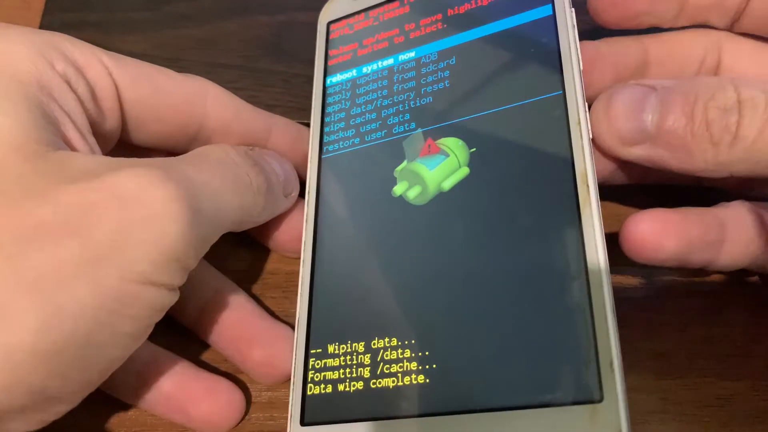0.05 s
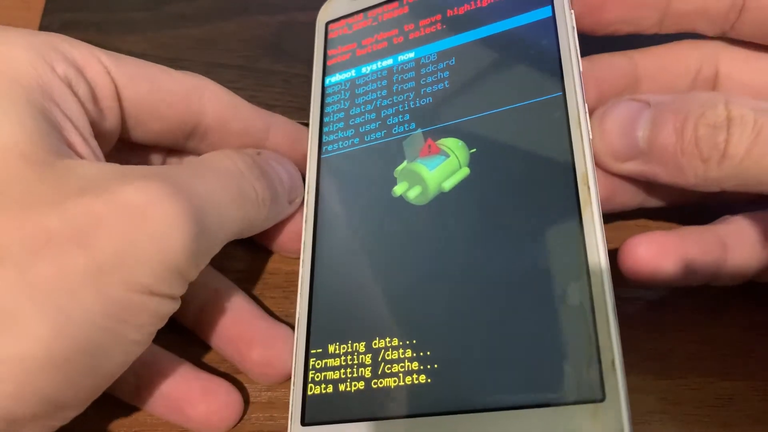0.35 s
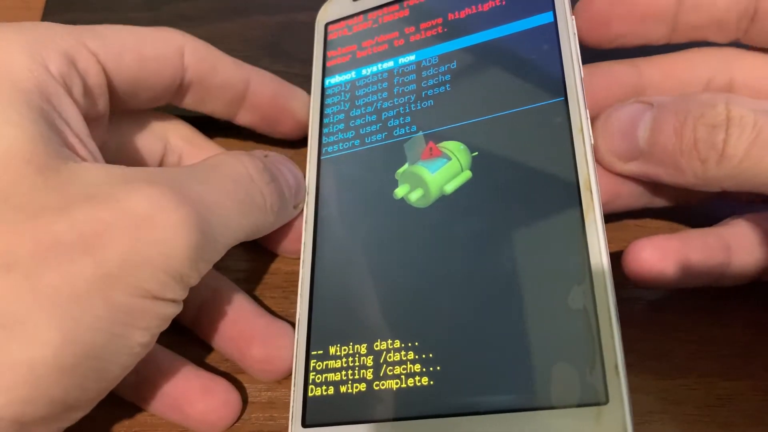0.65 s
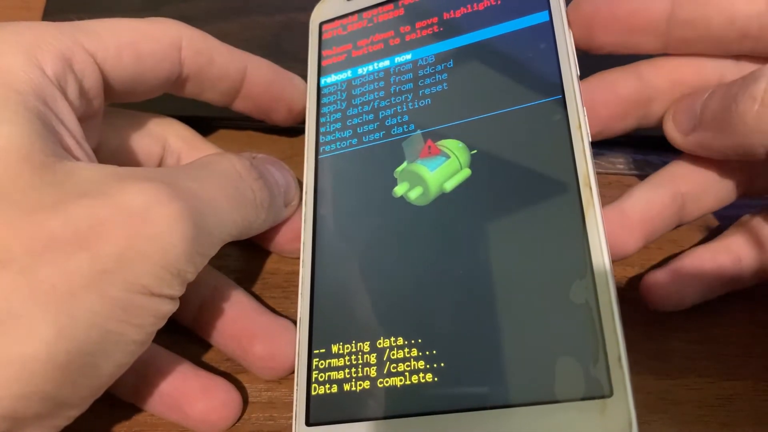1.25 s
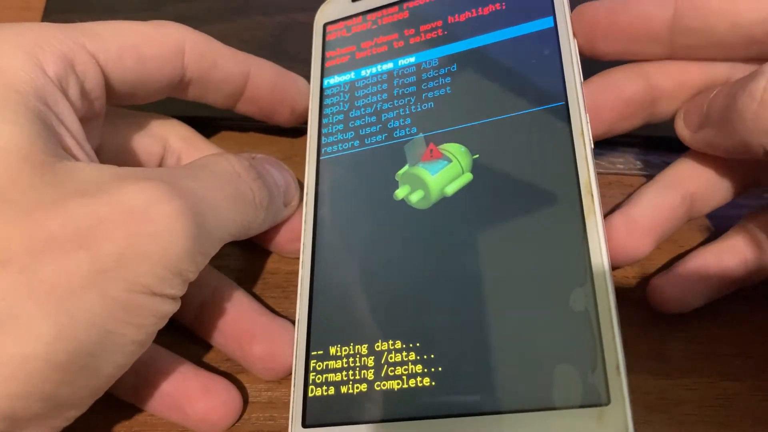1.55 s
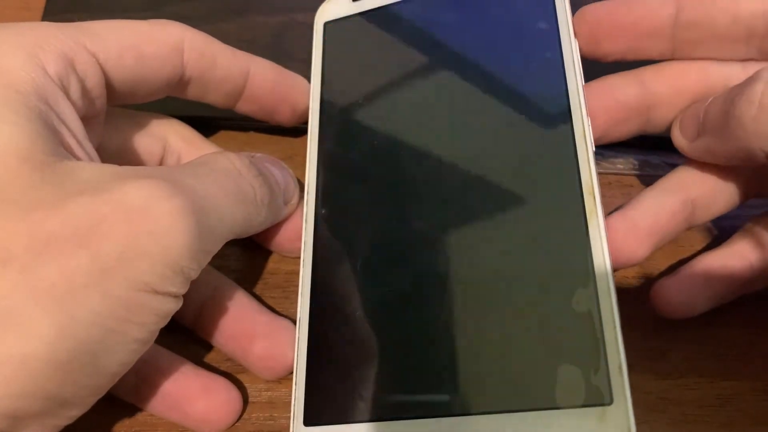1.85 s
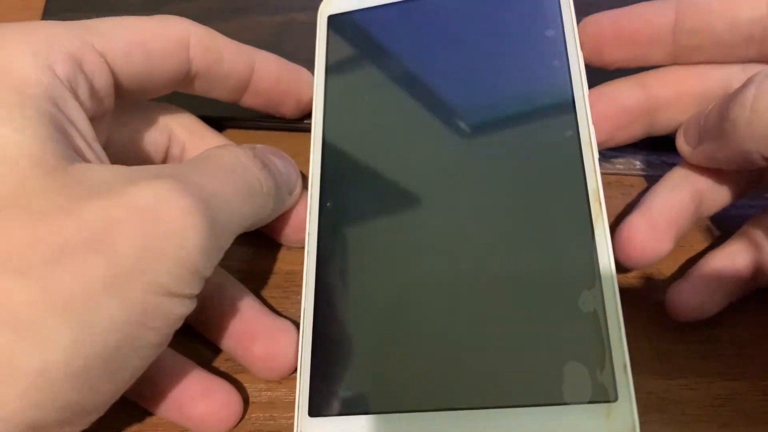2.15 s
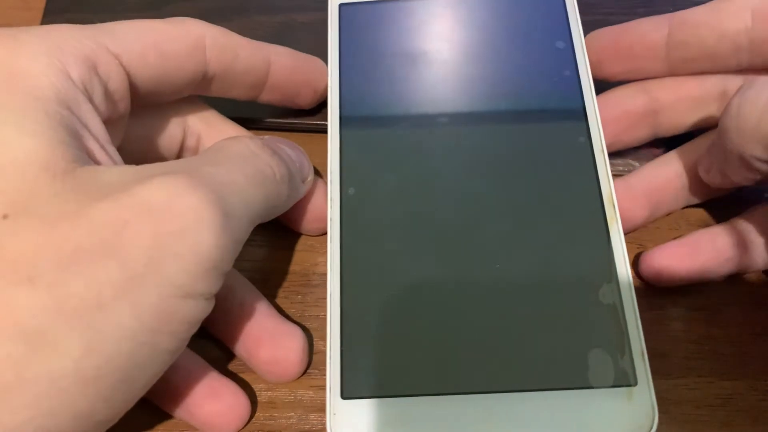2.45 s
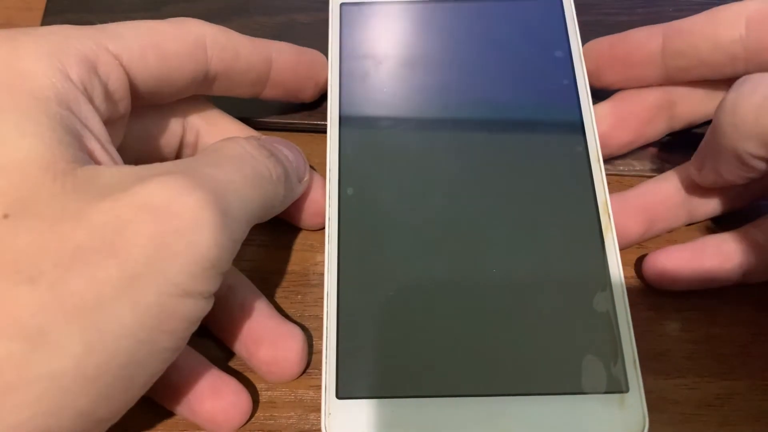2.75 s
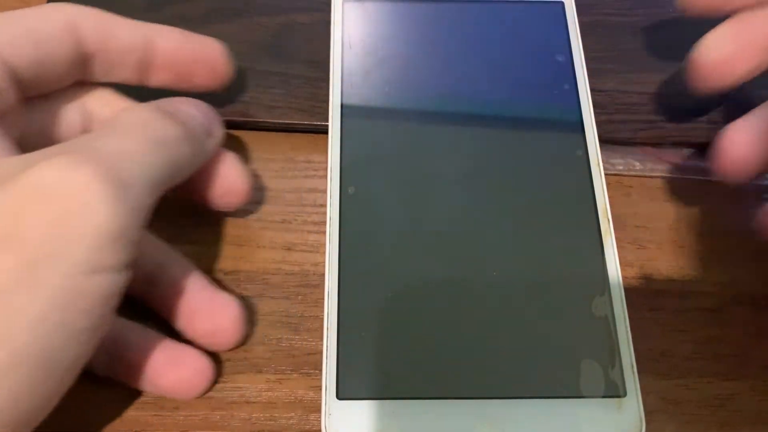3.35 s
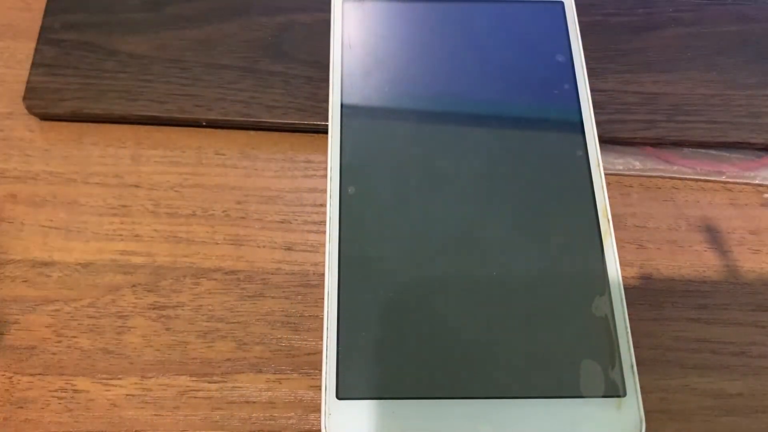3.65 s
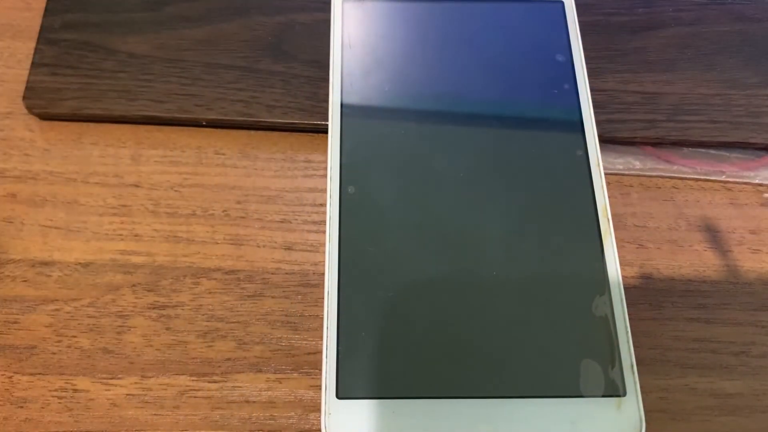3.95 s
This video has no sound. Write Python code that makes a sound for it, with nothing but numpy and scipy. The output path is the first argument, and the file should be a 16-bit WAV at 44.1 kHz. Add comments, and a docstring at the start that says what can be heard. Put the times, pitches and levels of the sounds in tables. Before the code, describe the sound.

A phone handled and set down on a wooden table, with light taps and sliding hands.

```python
"""Phone handled on a wooden table.

Two hands hold a phone in a quiet room, over mains hum and a low throbbing drone like a far engine.
Fingers rub, a side button clicks and the case ticks against the wood. The phone is let down with soft
thuds of the table and the hands slide away: skin hisses, and its ridges make a faint rising zip."""
import sys
import numpy as np
from scipy import signal
from scipy.fft import rfft, irfft
from scipy.io import wavfile
from scipy.ndimage import uniform_filter1d

SR = 44100
rng = np.random.default_rng(int(sys.argv[2]) if len(sys.argv) > 2 else 0)


def to_wav(sig):
    """Store sig (one row per channel, or 1-D mono) as 16-bit WAV at the path in sys.argv[1].

    Samples outside -1..1 are clipped; the rate is SR.
    """
    pcm = np.clip(np.atleast_2d(sig), -1, 1) * 32767
    pcm = np.round(pcm).astype(np.int16)
    wavfile.write(sys.argv[1], SR, pcm.T)  # frames by channels


N = 176400
T = np.arange(N) / SR
HZ = np.fft.rfftfreq(N, 1 / SR)

# Stereo image of friction noise: freq_hz, correlation
FRICTION_CORRELATION = [(200, 1), (700, 0.39), (1300, -0.64), (2000, -0.55), (3300, 0.59), (5000, -0.57)]


def amp(db):
    """Decibels to gain."""
    return 10 ** (np.asarray(db) / 20)


def unit(x):
    """Scale to rms 1."""
    return x / np.sqrt(np.mean(x ** 2) + 1e-20)


def at_hz(points, hz):
    """Interpolate a table over log frequency."""
    freq_hz, value = np.transpose(points)
    return np.interp(np.log(hz + 1), np.log(freq_hz + 1), value)


def add(mix, start_s, sound):
    """Mix a stereo sound in at start_s."""
    part = mix[:, round(start_s * SR):][:, :sound.shape[1]]
    part += sound[:, :part.shape[1]]


def drift(rate_hz):
    """Low-passed random wander, rms 1."""
    return unit(irfft(rfft(rng.standard_normal(N)) * np.exp(-(HZ / rate_hz) ** 2), N))


def noise(colour_db, correlation):
    """Coloured stereo noise, rms 1; left-right correlation clipped to +-1."""
    left, independent = rfft(rng.standard_normal((2, N)))
    same = np.clip(at_hz(correlation, HZ), -1, 1)
    right = same * left + np.sqrt(1 - same ** 2) * independent
    return unit(irfft(np.array([left, right]) * amp(colour_db), N))


def sides(pan_db):
    """Channel offsets in dB; positive pans left."""
    return np.array([[.5], [-.5]]) * pan_db


def swell(centre_s, half_width_s):
    """Gaussian envelope, 1/e at the half width."""
    return np.exp(-((T - centre_s) / half_width_s) ** 2)


def tone(hz, waver_db, waver_hz, slip_rad):
    """Sine on a pitch curve, unsteady in level and phase."""
    turns = np.cumsum(hz * np.ones(N)) / SR + rng.random()
    level = np.sqrt(2) * amp(waver_db * drift(waver_hz))
    return level * np.sin(2 * np.pi * turns + slip_rad * drift(waver_hz))


def ring(modes, rise_s):
    """Damped modes after one blow; softer blows rise more slowly."""
    t = T[:SR // 4]
    ringing = sum(amp(db - 60 * t / t60_s) * np.sin(2 * np.pi * hz * t) for hz, db, t60_s in modes)
    return (1 - np.exp(-t / rise_s)) * ringing


def case_tap(decay_s, bands_db, rise_s=0.00042, size=4096):
    """One contact and a few milliseconds of chatter ring the case."""
    # Tap spectrum bands: freq_hz
    bands_hz = [450, 850, 1700, 5000, 12000]
    # Resonances of the phone on wood: centre_hz, width_hz, lift_db
    resonances = [(544, 160, 10), (1150, 117, 9.5), (1510, 180, 5), (2100, 160, -3), (2630, 460, -0.5),
                  (3230, 310, -5.5), (3960, 351, -5.5), (4480, 690, 3), (5200, 150, -0.5), (6700, 390, 1.5),
                  (9200, 820, 9.5)]
    # Case radiation: freq_hz, pan_db
    radiation = [(450, 3), (1700, 1), (3000, 2), (5000, -5.5), (9000, -1.5)]
    hz, t = abs(np.fft.fftfreq(size, 1 / SR)), T[:size]
    colour_db = at_hz(list(zip(bands_hz, bands_db)), hz)
    colour_db += sum(db / (1 + (2 * (hz - centre) / width) ** 2) for centre, width, db in resonances)
    low_cut = (hz ** 2 + 100) / (hz ** 2 + 260 ** 2)
    gain = amp(colour_db - 1 + sides(at_hz(radiation, hz))) * low_cut
    body = np.exp(np.conj(signal.hilbert(np.log(gain))))  # minimum phase
    chatter = rng.choice([-1., 1.], (3, size)) * np.exp(-t / decay_s) * (1 - np.exp(-t / rise_s))
    chatter /= np.linalg.norm(chatter, axis=1, keepdims=True)
    correlation = 0.59
    rattle = 0.89 * np.fft.fft(np.sqrt(correlation) * chatter[2] + np.sqrt(1 - correlation) * chatter[:2])
    contact = 0.46 * np.fft.fft(np.arange(size) == round(rise_s * SR))
    lows = 1 / (1 + (hz / 3000) ** 2)  # contact carries the lows, chatter the highs
    force = rattle * np.sqrt(1 - .75 * lows) + contact * lows
    return np.fft.ifft(force * body).real


def case_ticks():
    """The case knocks on the wood, each knock with a short echo."""
    # Knocks: start_s, chatter_decay_s, then gain_db for each of case_tap's five bands
    knocks = [(0.4746, 0.0022, -6.5, -2, -9, -37.5, -41), (1.4106, .0014, -42, -26, -21.5, -33, -48),
              (2.3865, 0.0039, -12, -16, -11, -30, -29), (2.391, 0.0024, -13, -15, -15, -24.5, -34),
              (2.3937, .0012, -8, -9.5, -1.5, -19, -45), (2.5306, 0.0016, -46, -14.5, -9.5, -13, -17.5),
              (2.8843, 0.003, -10, -6, -25, -57, -51), (2.9075, 0.00068, -37, -44, -53, -49, -32),
              (3.129, 0.0029, -4.5, -15, -12, -32, -50), (3.1333, 0.0038, -1.5, -5.5, -8, -36, -47),
              (3.1622, 0.0048, -4, -3, -13.5, -19, -54), (3.181, 0.0048, -5, -16, -27, -26, -36),
              (3.212, 0.0032, -27, -15, -22, -40, -41), (3.2876, 0.00089, -8, -17, -18, -10, -20),
              (3.3158, .0014, -37, -8, -11, -7.5, -26), (3.802, 0.0049, -27, -30, -19, -21, -24),
              (3.816, .0053, -31, -51, -12, -17, -35), (3.825, 0.0045, -12, -29, -17, -17, -26.5)]
    out = np.zeros((2, N))
    for start_s, decay_s, *bands_db in knocks:
        knock = case_tap(decay_s, bands_db)
        add(out, start_s, knock)
        add(out, start_s, amp(-6) * room_echo(knock))
    return out


def table_bumps():
    """The table takes the weight of phone and hands in dull, damped thuds."""
    # Blows: start_s, gain_db
    blows = [(1.838, -31), (2.407, -36), (3.153, -26.5), (3.178, -31), (3.201, -25.5)]
    # Table modes: freq_hz, gain_db, t60_s
    modes = [(80, -5, 0.088), (117.6, 5.5, 0.054), (162.3, -4, 0.071), (296, -14.5, 0.075)]
    out = np.zeros((2, N))
    for start_s, gain_db in blows:
        add(out, start_s, amp(gain_db + sides(pan_db=-4)) * ring(modes, rise_s=0.0059))
    return out


def hand_slide():
    """Dry skin hisses over wood with uneven grip, brightest early in the stroke."""
    # Stroke: time_s, gain_db, tilt_db_per_octave
    stroke = [(3.11, -73, -6), (3.14, -54.5, -2), (3.194, -52, 0.5), (3.265, -59, -5.5), (3.3, -52, -3.5),
              (3.36, -46, 2), (3.46, -45, 1), (3.58, -43.5, 0.5), (3.72, -44, -0.1), (3.82, -48.5, -1),
              (3.85, -62.5, -2), (3.898, -66.5, -6), (4, -69, -2)]
    # Skin-on-wood spectrum: freq_hz, relative_db
    spectrum = [(150, -15), (500, -1), (850, -1.5), (1400, 2), (2200, -2.5), (3600, -0.5), (4700, -5.5),
                (6000, -3), (7500, -1.5), (8800, -1), (10700, -3.5), (12000, -3.5), (13500, 7.5),
                (14700, 0.5), (16000, 4.5)]
    time_s, gain_db, tilt = np.transpose(stroke)
    grip_db = 0.91 * drift(rate_hz=47) + 0.3 * drift(rate_hz=890)
    friction = noise(at_hz(spectrum, HZ), FRICTION_CORRELATION)
    hz, frame_s, frames = signal.stft(friction, SR, nperseg=256)
    octaves = np.log2(np.maximum(hz, 1000) / 8113)  # tilt pivots at 8113 Hz
    frames *= amp(octaves[:, None] * np.interp(frame_s, time_s, tilt))
    hiss = signal.istft(frames, SR, nperseg=256)[1][:, :N]
    return amp(np.interp(T, time_s, gain_db) + grip_db) * (T > time_s[0]) * hiss


def ridge_zips():
    """Fingertip ridges catch on the grain: fuzzy gliding tones, higher with speed."""
    # Glides: start_s, length_s, from_hz, to_hz, width_hz, gain_db
    glides = [(3.203, .072, 520, 485, 65, -51), (3.374, .028, 299, 433, 60, -46),
              (3.505, .075, 596, 880, 100, -52), (3.575, .089, 940, 1258, 130, -52.5),
              (3.661, .17, 1351, 2037, 1080, -55.5)]
    out = np.zeros((2, N))
    for start_s, length_s, from_hz, to_hz, width_hz, gain_db in glides:
        progress = np.clip((T - start_s) / length_s, 0, 1)
        phase = 2 * np.pi * np.cumsum(from_hz + (to_hz - from_hz) * progress) / SR + drift(width_hz)
        pair = np.array([np.sin(phase + 0.56 * drift(width_hz)) for _ in range(2)])
        arch = np.sqrt(4 * progress * (1 - progress))
        out += amp(gain_db + 2.17 * drift(width_hz)) * arch * pair
    return out * amp(sides(pan_db=4.5))


def button_click():
    """The side button springs back and the plastic rings, with an echo."""
    # Plastic modes: freq_hz, gain_db, t60_s
    modes = [(390, -14.5, 0.049), (1044, -13, .012), (1560, 0, 0.0073), (2380, -12, .011),
             (3150, -11, .011), (4300, -13, 0.0093), (6000, -24, .005)]
    click = amp(-34.5 + sides(pan_db=-5)) * ring(modes, rise_s=0.00027)
    out = np.zeros((2, N))
    add(out, start_s=1.641, sound=click)
    return out + amp(-8) * room_echo(out)


def finger_rubs():
    """Fingers shift lightly along the case: swells of friction noise."""
    # Rubs: centre_s, half_width_s, level_db, tilt_db_per_octave
    rubs = [(1.01, 0.11, -59, -2.5), (2.228, 0.071, -65, -0.5), (2.393, 0.044, -55.5, -4),
            (2.587, 0.035, -60.5, 1), (3.95, 0.21, -61, -4)]
    # Skin-on-case spectrum: freq_hz, relative_db
    spectrum = [(200, -4), (600, 4.5), (1200, 8.5), (2200, 4), (3000, -6), (4300, -2), (8000, -11.5),
                (11000, -4), (15000, 1)]
    treble_octaves = np.log2(np.maximum(HZ, 2000) / 2000)
    out = np.zeros((2, N))
    for centre_s, half_width_s, level_db, tilt in rubs:
        friction = noise(at_hz(spectrum, HZ) + tilt * treble_octaves, FRICTION_CORRELATION)
        out += amp(level_db) * swell(centre_s, half_width_s) * friction
    return out


def edge_scrape(centre_hz=9960, width_hz=690, level_db=-59):
    """The case edge scrapes as it settles: a brief narrow hiss."""
    colour_db = -20 * np.log10(1 + (2 * (HZ - centre_hz) / width_hz) ** 2)
    envelope = amp(level_db) * swell(centre_s=3.198, half_width_s=0.027)
    return envelope * noise(colour_db, FRICTION_CORRELATION)


def room_echo(x):
    """Short diffuse tail, each band with its own decay."""
    # Room decay: freq_hz, t60_s
    decay = [(200, 0.57), (1500, 0.16), (5000, 0.24), (15000, 0.091)]
    hz, frame_s, frames = signal.stft(rng.standard_normal((2, SR // 4)), SR, nperseg=256)
    frames *= amp(-60 * frame_s / at_hz(decay, hz)[:, None])
    tail = signal.istft(frames, SR, nperseg=256)[1]
    return signal.fftconvolve(x, tail / np.linalg.norm(tail[0]), axes=1)[:, :N]


def drones():
    """Two low gliding tones beat together; the upper has a weak octave."""
    # Lower and upper drone: time_s, pitch_hz, gain_db
    lower = [(0, 50.83, -42.5), (.7, 48.3, -39.5), (.93, 47.2, -43), (1.07, 47.78, -34.5),
             (1.6, 47.37, -43.5), (1.8, 48.6, -47), (2.05, 47.86, -41), (2.44, 48.4, -41.5),
             (2.6, 48.54, -53), (2.74, 48.46, -40), (2.85, 49.14, -39.5), (2.93, 49.36, -54),
             (3.01, 49.5, -38.5), (3.25, 49.05, -42), (3.74, 51.92, -41.5), (4, 53.75, -48.5)]
    upper = [(0, 68.36, -46), (0.349, 70.98, -51.5), (.78, 71.44, -36), (1.299, 73.1, -38),
             (1.78, 74.8, -36.5), (2.1, 74.37, -41), (2.52, 74, -61), (2.7, 74.3, -49), (3, 74.24, -56),
             (3.38, 72.3, -46), (4, 68.6, -46.5)]
    out = np.zeros(N)
    for curve in (lower, upper):
        time_s, hz, db = np.transpose(curve)
        pitch_hz, gain_db = np.interp(T, time_s, hz), np.interp(T, time_s, db)
        out += amp(gain_db) * tone(pitch_hz, waver_db=1.4, waver_hz=7.5, slip_rad=.12)
        if curve is upper:
            out += amp(gain_db - 18.5) * tone(2 * pitch_hz, waver_db=4, waver_hz=5.2, slip_rad=.9)
    return out


def mains_hum():
    """Two wavering mains harmonics."""
    # Harmonics: freq_hz, gain_db
    harmonics = [(120, -55), (480, -69.5)]
    return sum(amp(db) * tone(hz, waver_db=3.5, waver_hz=10, slip_rad=.4) for hz, db in harmonics)


def room_air(level_db=-46.5, waver_db=2.33):
    """Room rumble and hiss, wavering in time-frequency patches."""
    # Room noise spectrum: freq_hz, relative_db
    spectrum = [(20, -13), (35, -7), (55, 3), (88, 0), (108, -7.5), (130, -4.5), (150, -2), (172, -2.5),
                (200, -9), (260, -15.5), (315, -11), (400, -18), (540, -19.5), (720, -26.5), (1200, -22.5),
                (1600, -30), (2200, -31.5), (3200, -43.5), (5500, -50), (8000, -52), (12000, -48.5),
                (15500, -43)]
    # Room noise balance: freq_hz, pan_db
    balance = [(40, -5.5), (80, 2.5), (150, -3), (300, 1), (900, 1.5), (2500, 0), (15000, -0.5)]
    # Room noise stereo image: freq_hz, correlation (before clipping)
    correlation = [(50, 2), (150, 0.68), (280, 1.02), (450, -0.07), (750, -0.16), (2000, -0.19), (5000, 0)]
    steady = noise(at_hz(spectrum, HZ) + sides(at_hz(balance, HZ)), correlation)
    frames = signal.stft(steady, SR, nperseg=1024)[2]
    patches = uniform_filter1d(rng.standard_normal(frames.shape[1:]), size=5, axis=0)
    patches = uniform_filter1d(patches, size=12, axis=1)
    frames *= amp(waver_db * unit(patches))
    return amp(level_db) * signal.istft(frames, SR, nperseg=1024)[1][:, :N]


def scene():
    """Close handling sounds over drone, hum and room noise."""
    handling = case_ticks() + button_click() + finger_rubs() + edge_scrape()
    handling += hand_slide() + ridge_zips() + table_bumps()
    tones = (drones() + mains_hum()) * amp(sides(pan_db=-3))
    return handling + tones + room_air()


def record(dry):
    """Fade the ends, replace the left treble with the right's, slightly late, then low-pass."""
    fade_s, cutoff_hz = .004, 15850
    crossover_hz, in_phase_hz, lag_s = 6780, 10896, 0.00021
    fade = np.minimum(np.minimum(T, T[::-1]) / fade_s, 1)
    left, right = rfft(dry * fade)
    treble = 1 / (1 + (crossover_hz / (HZ + 1)) ** 16)
    late_right = right * np.exp(-2j * np.pi * (HZ - in_phase_hz) * lag_s)
    left = np.sqrt(1 - treble) * left + np.sqrt(treble) * late_right
    lowpass = signal.firwin(511, cutoff_hz, window=("kaiser", 9), fs=SR)
    return signal.oaconvolve(irfft(np.array([left, right]), N), lowpass[None], "same")


dry = scene()
out = record(dry)
to_wav(out)
```